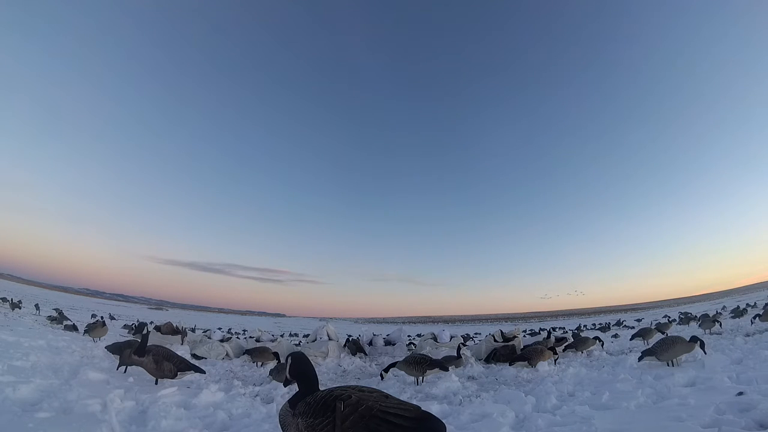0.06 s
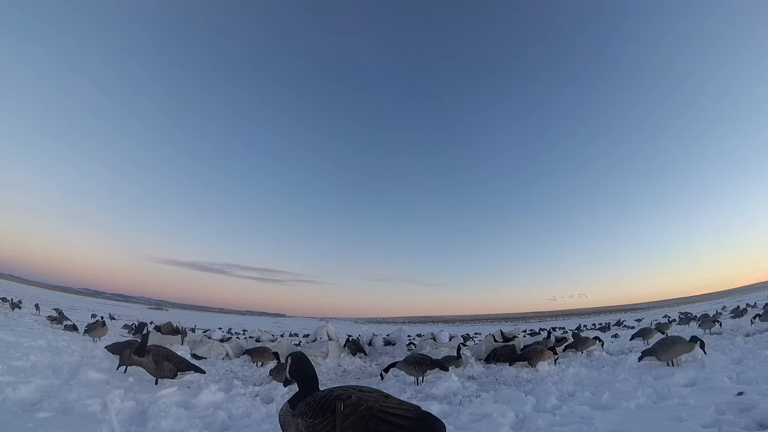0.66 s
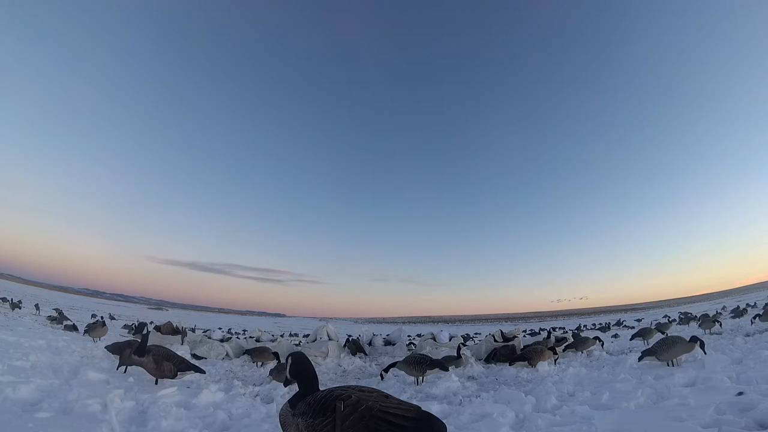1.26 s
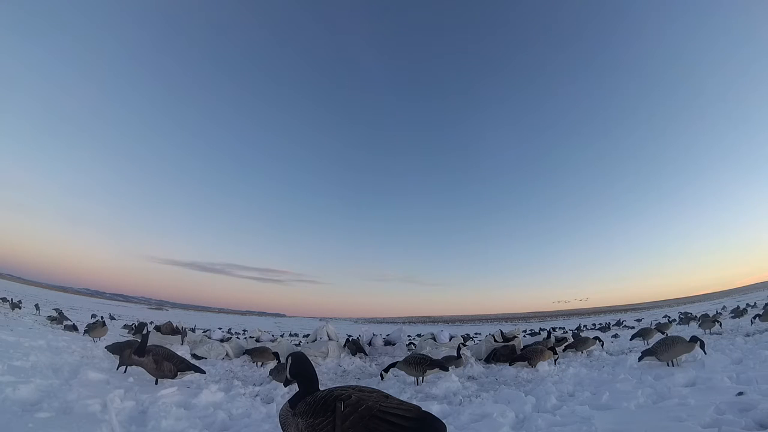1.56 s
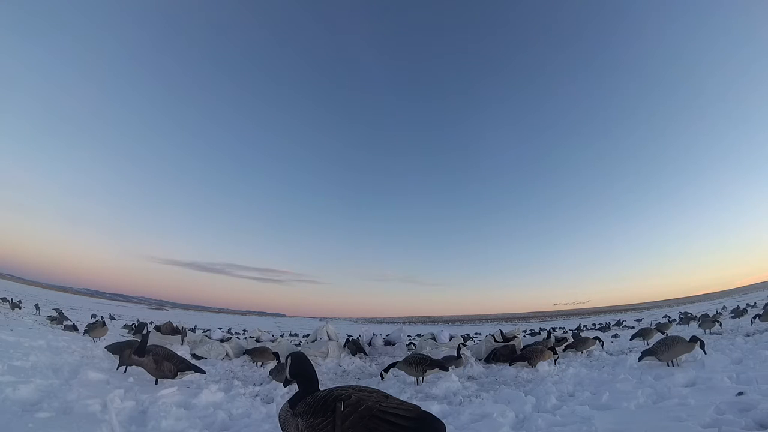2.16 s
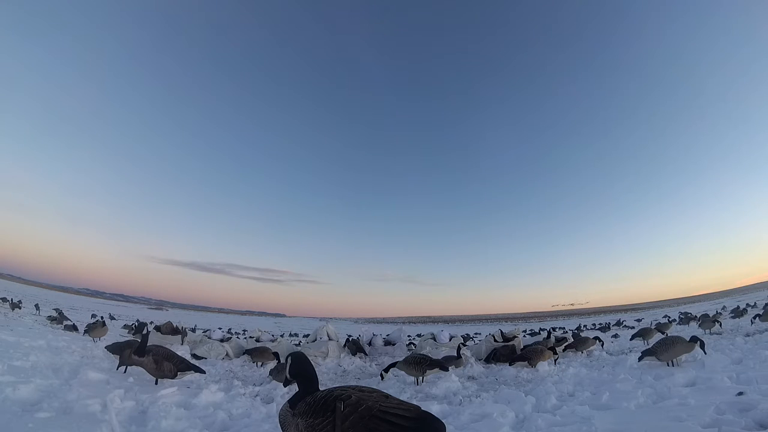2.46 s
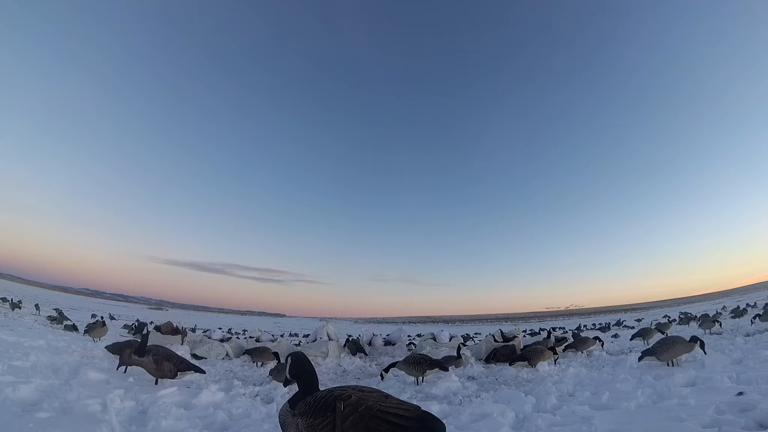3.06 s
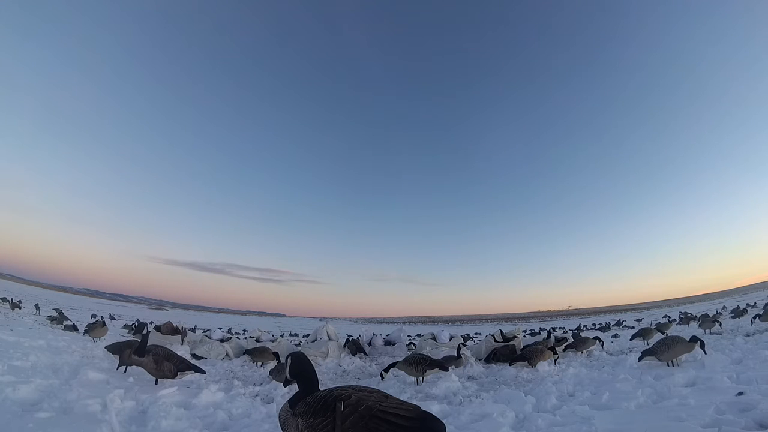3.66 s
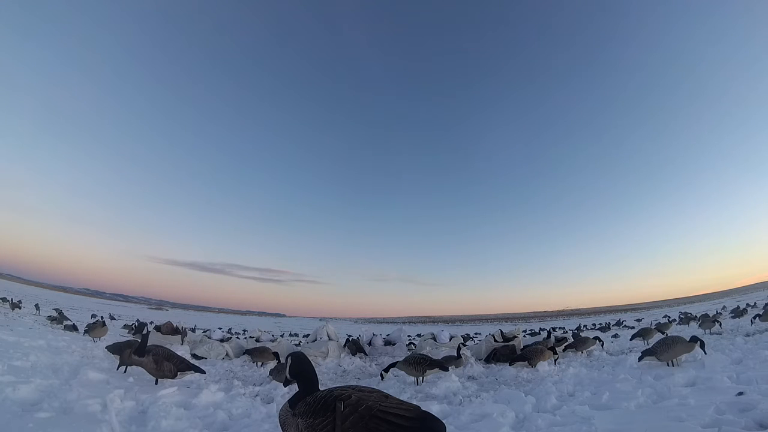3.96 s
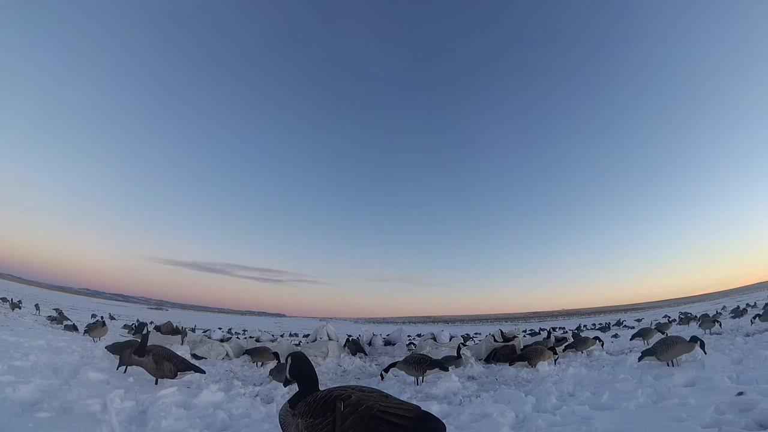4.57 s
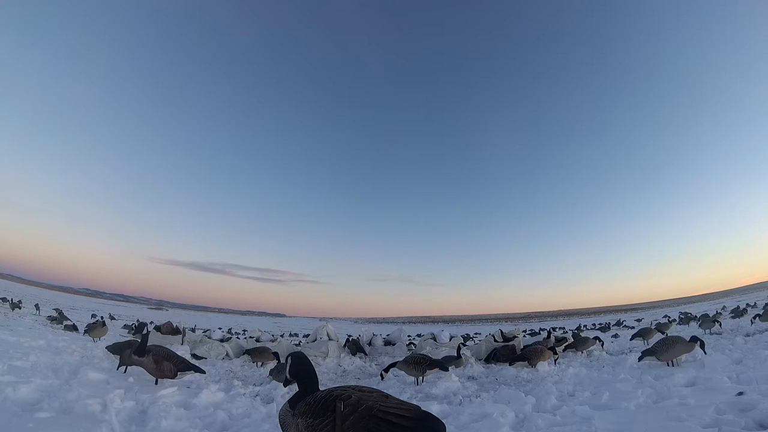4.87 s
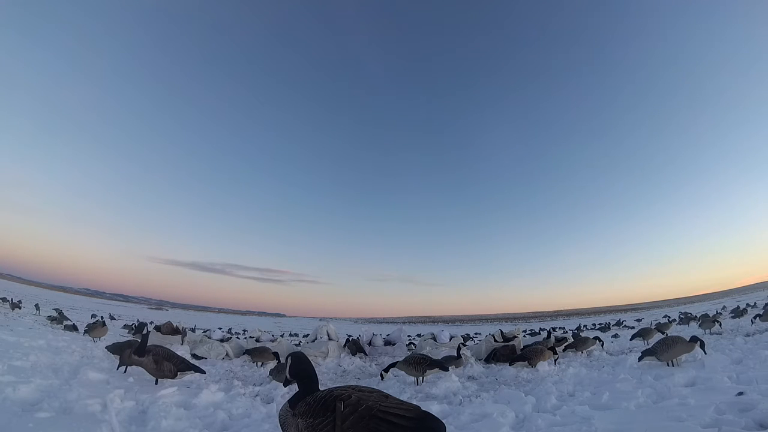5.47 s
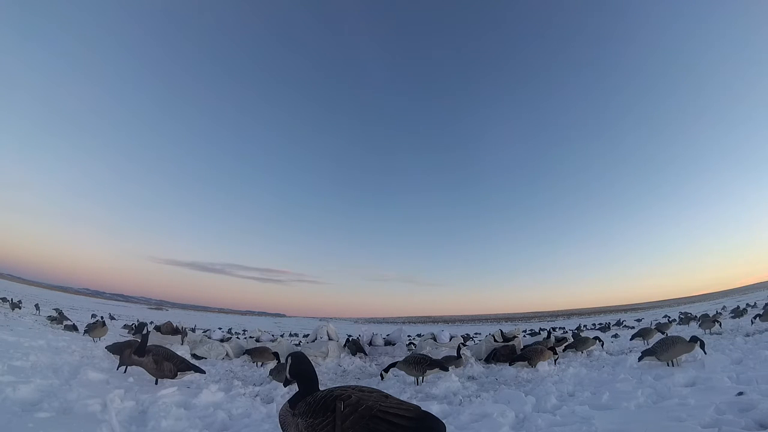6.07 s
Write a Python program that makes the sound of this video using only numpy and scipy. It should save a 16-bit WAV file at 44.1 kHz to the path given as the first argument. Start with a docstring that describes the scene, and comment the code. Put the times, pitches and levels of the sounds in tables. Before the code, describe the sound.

A goose calls in three bouts over an open snowy field. A full honk is a soft lead note and a low rattling murmur that breaks upward into a louder, sharp cluck, sagging at its end. Three honks come right away, peaking at about 0.2, 0.6 and 1.0 seconds. After a pause, a run of about six honks and clucks lasts from 2.3 to 4.3 seconds. Following another pause, three quicker ones come from 5.5 to 6.2 seconds, and one more soft note begins at about 6.3 seconds. The calls are nearly dry, with only a short, dull tail. Throughout, well below the goose, a distant flock blurs into a wavering drone. There is also a faint steady microphone hiss, a slight low rumble and hum, and a thin, very high, pulsing electronic whine.

```python
"""Goose calling over a snowy field

A goose honks in three bouts. A full honk is a soft lead note, a low murmur, then a break up into a loud
cluck that sags at its end. Source and filter: a vibrating membrane supplies harmonics in three registers,
and fixed throat resonances shape them all. The field scatters back a short, dull tail. Behind lie the
drone of a far flock, a low rumble and hum, steady hiss and a faint, pulsed electronic whine."""
import sys
import numpy as np
from scipy import signal
from scipy.fft import rfft, irfft
from scipy.io import wavfile
from scipy.ndimage import uniform_filter1d, map_coordinates

SR = 44100
rng = np.random.default_rng(int(sys.argv[2]) if len(sys.argv) > 2 else 0)


def generate_wav(signal):
    """Clip the signal to [-1, 1] and save it as 16-bit WAV at the path in sys.argv[1]."""
    frames = np.transpose(np.atleast_2d(signal))
    scaled = np.clip(frames, -1, 1) * 32767
    pcm = np.round(scaled).astype(np.int16)
    wavfile.write(sys.argv[1], SR, pcm)


N = 278271
TIME = np.arange(N) / SR
FREQS = np.fft.rfftfreq(N, 1 / SR)
SIDES = np.array([[.5], [-.5]])  # splits a left-minus-right difference between the channels
EDGE_S = .003  # a note opens and closes within twice this time


def undb(db):
    """Amplitude ratio of a level in decibels."""
    return 10 ** (np.asarray(db) / 20)

def unit(x):
    """Normalisation to rms 1."""
    return x / np.sqrt(np.mean(x ** 2))

def ramp(t, length_s):
    """Linear fall from 1 to 0 as t goes from 0 to length_s."""
    return np.clip(1 - t / length_s, 0, 1)

def curve(rows, t):
    """Linear interpolation of a table's value columns at times t."""
    times, *columns = np.transpose(rows)
    return [np.interp(t, np.sort(times), column) for column in columns]

def at_hz(points, hz):
    """Interpolation of (f/Hz, value) points on a logarithmic frequency axis."""
    f, value = np.transpose(points)
    return np.interp(np.log(np.maximum(hz, 1)), np.log(f), value)

def noise(spectrum):
    """Spectral shaping of white noise, normalised to rms 1."""
    return unit(irfft(rfft(rng.standard_normal(N)) * undb(at_hz(spectrum, FREQS)), N))

def wander(t, rate):
    """Smooth random fluctuation of spread near 1, with rate new values a second."""
    return map_coordinates(rng.standard_normal(8192), [(t - t[0]) * rate], order=3, mode="wrap")


# hiss spectrum: f/Hz, relative level/dB
HISS_SPECTRUM = [(60, -9), (300, -2), (1500, 0.5), (2200, 2), (4000, -0.5), (5100, 1.5), (5900, -2),
                 (8200, -2), (9200, 1.5), (12300, 1.5), (13400, 5), (15200, 2)]
# stereo width of the hiss: f/Hz, amplitude ratio of channel difference to channel mean
HISS_WIDTH = [(300, 1.87), (6000, 2.17), (9000, 2.8), (13000, 1.9)]

def hiss():
    """Microphone self-noise: steady, broadband and largely uncorrelated between the channels."""
    difference = irfft(rfft(noise(HISS_SPECTRUM)) * at_hz(HISS_WIDTH, FREQS), N)
    return undb(-63.5) * (noise(HISS_SPECTRUM) + SIDES * difference)


# the two whine tones: f/Hz
WHINE_HZ = (11204, 10787)
# their strengths before gating: level/dB, left minus right/dB
WHINE_LEVELS = [(-63.5, -7), (-74, -7)]
# switching cycle: fraction of the period, gain
WHINE_GATE = [(0, .85), (.12, .8), (.19, 1.2), (.23, 1.1), (.28, .05), (.8, .05), (.89, .8), (1, .85)]

def whine(switch_hz=59.94):
    """Amplitude modulation: electronics gate two thin tones and a fizz, ticking at each switch."""
    cycle = TIME * switch_hz % 1
    gate, = curve(WHINE_GATE, cycle)
    waver = .75 * wander(TIME, 70)
    tones = sum(undb(db + SIDES * pan_db) * np.sqrt(2) * np.sin(2 * np.pi * hz * TIME + waver)
                for hz, (db, pan_db) in zip(WHINE_HZ, WHINE_LEVELS))
    fizz = noise([(9500, -30), (10600, -8), (11200, 0), (11600, -15), (12500, -25)])
    switching = np.exp(-((cycle - .21) / .099) ** 2) + np.exp(-((cycle - .87) / .066) ** 2)
    ticks = switching * noise([(6000, -25), (9300, 0), (12000, -6), (13400, 3), (15000, -3)])
    return gate * (tones + undb(-68 - SIDES * 6) * fizz) + undb(-69 + SIDES * 4) * ticks


# rumble spectrum: f/Hz, relative level/dB
RUMBLE_SPECTRUM = [(20, 3), (31, -13), (50, -9), (68, -2.5), (90, -2.5), (130, 0.5), (175, -14), (215, -1),
                   (240, -8), (262, 2.5), (300, -7.5), (326, 2.5), (365, -6), (420, -1.5), (480, -15),
                   (1200, -24)]
# rumble envelope: t/s, level/dB
RUMBLE_LEVEL = [(0, -71), (1, -72), (1.8, -77.5), (2.3, -79.5), (2.8, -69), (3.6, -71), (4.5, -72),
                (4.9, -76), (5.55, -68), (6.3, -72)]

def rumble():
    """Low-frequency noise under a slow envelope, nearly coherent between the channels."""
    db, = curve(RUMBLE_LEVEL, TIME)
    return undb(db) * (noise(RUMBLE_SPECTRUM) + .074 * SIDES * noise(RUMBLE_SPECTRUM))


# hum envelopes: t/s, level at 121 Hz/dB, level at 87 Hz/dB
HUM_LEVELS = [(0, -97, -78), (.55, -76, -98), (1.05, -81, -79), (1.5, -108, -96), (2, -79.5, -84),
              (2.5, -93, -98), (2.8, -76, -92), (3.55, -74, -84), (4.05, -81, -88), (4.5, -71, -77),
              (5.05, -85, -90), (5.5, -78.5, -87), (5.8, -76.5, -72), (6.05, -79, -86), (6.3, -75, -84)]

def hum():
    """Random phase modulation makes two far, low tones waver."""
    return sum(undb(db) * np.sqrt(2) * np.sin(2 * np.pi * hz * TIME + .36 * wander(TIME, 4.8))
               for hz, db in zip((121, 87), curve(HUM_LEVELS, TIME)))


# flock spectrum: f/Hz, relative level/dB
FLOCK_SPECTRUM = [(450, -21), (540, -14.5), (610, -5.5), (680, -14), (760, 0.5), (810, -5.5), (870, -3),
                  (930, 2.5), (985, -4.5), (1080, -12), (1200, -24), (1350, -11.5), (1520, -16.5),
                  (2200, -39.5)]
# flock envelope: t/s, level/dB
FLOCK_LEVEL = [(0, -66.5), (.8, -65), (1.3, -65), (2.1, -65.5), (2.7, -65.5), (3.4, -63.5), (4.4, -63.5),
               (4.8, -65), (5.3, -64.5), (6.3, -63)]

def flock():
    """Incoherent superposition: far calls blur to a wavering drone, modelled as shaped noise."""
    db, = curve(FLOCK_LEVEL, TIME)
    envelope = undb(db + wander(TIME, 6.9) + SIDES * 1.8)
    return envelope * (noise(FLOCK_SPECTRUM) + .13 * SIDES * noise(FLOCK_SPECTRUM))


# envelope of the thin tone above the drone: t/s, level/dB
RING_LEVEL = [(0, -74), (.8, -67.5), (1.35, -69.5), (1.8, -72), (2.25, -71), (3.3, -69.5), (4.4, -71),
              (4.9, -68.5), (5.3, -71), (6.25, -67.5)]

def ring(hz=988):
    """Narrow-band noise: two random quadrature components form a thin, unsteady tone."""
    db, = curve(RING_LEVEL, TIME)
    phase = 2 * np.pi * hz * TIME
    tone = wander(TIME, 38) * np.cos(phase) + wander(TIME, 38) * np.sin(phase)
    return undb(db + SIDES * 2.6) * tone


def field(calls, scatter_db=-25.5, t60_s=.15, echo_s=.058, echo_db=-35.5):
    """Scattering and reflection: snow and things standing on it return a dull tail and one faint echo."""
    mono = calls.mean(axis=0)
    t = TIME[:SR // 2]
    dull = signal.butter(1, 2500, fs=SR, output="sos")
    middle, side = rng.standard_normal((2, len(t))) * np.exp(-np.log(1000) * t / t60_s) * (t > .004)
    tail = signal.sosfilt(dull, middle + SIDES * side)
    tail /= np.sqrt(np.mean(np.sum(tail ** 2, axis=1)))
    scatter = signal.fftconvolve(mono[None], tail, axes=1)[:, :N]
    echo = signal.sosfilt(dull, np.interp(TIME - echo_s, TIME, mono, left=0))
    return undb(scatter_db) * scatter + undb(echo_db) * echo


# throat resonances: f/Hz, bandwidth/Hz, level/dB
FORMANTS = [(615, 62, -28), (776, 143, -9), (888.6, 63, 2.5), (997, 80, 9), (1242, 39, -4),
            (1617, 360, 0.5), (2203, 104, -9.5), (2444, 65, -10), (2720, 380, -11), (3307, 160, -16),
            (3610, 320, -16), (4072, 100, -14), (4350, 247, -12.5), (4660, 250, -22), (5880, 1280, -25),
            (6484, 290, -22.5), (7460, 230, -27), (9100, 760, -34.5)]
# narrow dips, and two slight lifts: f/Hz, width/Hz, gain/dB
NOTCHES = [(1167, 103, -12.5), (1930, 88, 5), (2584, 81, -18), (3250, 58, -22), (4340, 110, 1.5),
           (5200, 330, -9)]

def throat(hz):
    """Resonance of windpipe and bill: a gain with steep peaks and deep valleys."""
    peaks = sum(undb(db) / (1 + (2 * (hz - f) / width) ** 2) for f, width, db in FORMANTS)
    notch_db = sum(db * np.exp(-(2 * (hz - f) / width) ** 2) for f, width, db in NOTCHES)
    return peaks * undb(notch_db)


# effect of the bill's opening: t/s, tilt above 2 kHz/(dB/octave), reedy edge at 5.8 kHz/dB
BILL_OPENING = [(0, -1, 6), (.24, -4, 17), (.63, -2, 11.5), (1.07, -2, 13), (2.38, 2.5, -10),
                (2.55, -0.5, -5), (2.87, 0, -6), (3.2, 1, -4), (3.6, 0, -5), (3.9, 1.5, -1), (4.24, 0.5, 0),
                (5.64, -0.5, -2), (5.91, 0.5, 1), (6.18, 2, -4)]

def bill_db(t, hz, strain):
    """Radiation from the bill: its opening sets the treble, and strain tilts that down."""
    tilt, edge_db = curve(BILL_OPENING, t)
    treble_db = (tilt - 5 * strain) * np.log2(np.maximum(hz / 2000, 1))
    return treble_db + edge_db * np.exp(-((hz - 5800) / 380) ** 2)


# level difference of the caller between the channels: f/Hz, left minus right/dB
STEREO_LEVEL = [(800, 1.5), (1600, 3), (2250, -0.5), (2450, -0.5), (3100, -8), (3600, -2), (3950, 7),
                (4400, 1), (5200, 5), (5800, 11), (6700, -10.5), (7600, 5.5)]
# its phase difference: f/Hz, lead of the left/rad
STEREO_PHASE = [(800, 0.17), (1450, -1.13), (1700, 0.53), (2400, 0.33), (3000, 2.5), (4300, 1.08),
                (5000, 2), (6200, 2.5), (7600, 2.04)]

def stereo_partials(hz, phase):
    """Two-point reception: each partial reaches left and right with its own level and lag."""
    sides = SIDES[:, :, None]
    return undb(sides * at_hz(STEREO_LEVEL, hz)) * np.cos(phase + sides * at_hz(STEREO_PHASE, hz))


def during(start, length):
    """Time window of a note: its samples, the seconds since its start and those until its end."""
    span = np.flatnonzero((TIME > start - EDGE_S) & (TIME < start + length + EDGE_S))
    return span, TIME[span] - start, start + length - TIME[span]


def membrane(window, hz, db, colour, jitter, shimmer, crack, rasp_db, slack_tilt, taut_hz, strain=0):
    """Source-filter model of one note: returns the throat-filtered harmonics and the raw air noise."""
    span, age, left = window
    t = TIME[span]
    dulling = slack_tilt * np.minimum(np.log2(hz / taut_hz), 0)  # dB/octave lost by a slack membrane
    # the oscillation is least regular as it starts and stops
    unsteady = 1 + crack * (np.exp(-(age / .012) ** 2) + .59 * np.exp(-(left / .0093) ** 2))
    hz = hz * (1 + jitter * unsteady * wander(t, 586))
    phase = 2 * np.pi * np.cumsum(hz) / SR
    # strain adds a rattle at a third of the pitch and weakens the odd overtones
    rattle = strain * np.sin(phase / 3 + .42 * wander(t, 63))
    phase += .13 * rattle
    k = np.arange(1, 15)[:, None]
    partial_hz = k * uniform_filter1d(hz, size=130)
    source_db = at_hz(colour, partial_hz) - 8 * strain * (k % 2) * (k > 1)
    source_db += dulling * np.log2(np.maximum(partial_hz / 1300, 1))
    gains = throat(partial_hz) * undb(source_db + bill_db(t, partial_hz, strain))
    gains /= np.sqrt(np.sum(gains ** 2, axis=0) / 2)
    # the upper partials swell and fade independently
    gains *= undb(.9 * np.clip(partial_hz / 2000 - 1, 0, 1) * np.array([wander(t, 45) for _ in k]))
    throat_lag = 2.6 * np.log(partial_hz / 1000)
    partials = stereo_partials(partial_hz, k * phase - throat_lag)
    fade = 1 - ramp(np.minimum(age, left) + EDGE_S, 2 * EDGE_S)
    envelope = undb(db) * fade * (1 + shimmer * unsteady * wander(t, 605) + .21 * rattle)
    puffs = (1 + np.cos(phase)) * rng.standard_normal(len(t))  # air escapes once a cycle
    voice, air = np.zeros((2, N)), np.zeros(N)
    voice[:, span] = envelope * np.sum(gains * partials, axis=1)
    air[span] = undb(rasp_db) * envelope * unsteady * puffs
    return voice, air


# murmurs: t/s, length/s, crest delay/s, first f/Hz, crest f/Hz, last f/Hz,
# arch exponent (1 pointed, 2 round), base level/dB, strain (0-1)
MURMURS = [(0.123, 0.094, 0.043, 505.5, 595, 509, 1.24, -56.5, 0.42),
           (0.506, .098, 0.065, 495, 611, 545, 2, -57.5, 0.35),
           (0.938, 0.096, 0.056, 534, 605, 546, 2, -56, 0.44),
           (2.278, 0.056, 0.061, 472, 587, 580, 0.66, -54.5, 0.39),
           (2.432, 0.086, 0.016, 567, 573, 524, 1.94, -52.5, 0.72),
           (2.664, .185, .096, 491.3, 611.7, 537, 1.59, -56, 0.45),
           (3.110, 0.054, .044, 522, 620, 560, 1.2, -57.5, .35),
           (3.360, .228, 0.18, 450, 567, 534, 0.52, -55.5, 0.089),
           (3.817, 0.052, 0.07, 501, 605, 585, 1.6, -57, 0.74),
           (4.135, 0.065, 0.0435, 533, 614, 598, 1.5, -57, .6),
           (5.438, 0.014, .018, 479, 505, 509, .8, -54, 0.71),
           (5.544, 0.069, 0.034, 530, 596, 555, 1.9, -55, 0.81),
           (5.805, 0.087, .062, 497, 620.6, 601, 1.95, -56, 0.61),
           (6.070, 0.085, 0.065, 521, 628.5, 615, 2.14, -56.5, 0.78)]
# membrane spectrum in the low register: f/Hz, relative level/dB
MURMUR_COLOUR = [(550, -0.5), (1100, 4.5), (1700, -2.5), (2400, 5), (3000, 14), (3600, 8), (4400, -2),
                 (6500, -13)]
# swell where the partials meet resonances: fundamental f/Hz, gain/dB
MURMUR_BLOOM = [(455, -1), (480, -1.5), (497, 2.5), (515, 5.5), (535, 1.5), (560, -1.5), (587, -3),
                (600, 0.5), (611, 6), (627, 8)]

def murmur(start, length, crest, first_hz, crest_hz, last_hz, roundness, level_db, strain):
    """Resonant reinforcement: a low, rattling note blooms as its arching pitch crosses the resonances."""
    window = _, age, left = during(start, length)
    climb = ramp(age, crest) ** roundness
    sink = ramp(left, max(length - crest, EDGE_S)) ** roundness
    hz = crest_hz + (first_hz - crest_hz) * climb + (last_hz - crest_hz) * sink
    db = level_db + at_hz(MURMUR_BLOOM, hz) - 6 * ramp(age, .014)
    waver = 1 + .0082 * wander(age, 60.7)
    return membrane(window, hz * waver, db, MURMUR_COLOUR, jitter=.009, shimmer=.11, crack=.94,
                    rasp_db=-11.5, slack_tilt=11, taut_hz=596, strain=strain)


# lead notes: t/s, length/s, f/Hz and level/dB at full effort, ebb/(dB/s)
LEADS = [(0.003, 0.11, 766.5, -45, 38), (0.413, 0.09, 758, -46, 49), (0.854, 0.081, 751.5, -47.5, 38),
         (2.329, 0.11, 801.6, -42, 38.5), (2.994, 0.11, 802, -40, 66.5), (3.729, 0.079, 805.5, -40, 119),
         (4.046, 0.1, 779, -43.5, 104), (5.455, 0.1, 760, -47, 116), (5.765, 0.036, 761, -46, 172),
         (6.027, 0.048, 807, -41.3, 144), (6.294, .060, 798, -42.5, 60)]
# membrane spectrum in a lead note: f/Hz, relative level/dB
LEAD_COLOUR = [(750, 5.5), (1500, 1.5), (2300, 1), (3100, 3), (3800, 1.5), (4600, -5), (6000, 3),
               (8000, -3)]

def lead(start, length, pitch_hz, level_db, ebb, hz_per_db=5.5):
    """Coupling of pitch and level: both follow the effort as a soft note rises, ebbs and lets go."""
    window = _, age, left = during(start, length)
    effort_db = -9 * ramp(age, .0081) - ebb * age - 7.5 * ramp(left, .017)
    return membrane(window, pitch_hz + hz_per_db * effort_db, level_db + effort_db, LEAD_COLOUR,
                    jitter=.0023, shimmer=.011, crack=9.9, rasp_db=-35, slack_tilt=13, taut_hz=780)


# clucks: t/s, length/s, crest delay/s, crest f/Hz, bend/(Hz/s^2), level/dB, squeak level/dB
CLUCKS = [(0.210, .067, .024, 806.5, 26000, -40.3, -54), (0.598, .067, 0.0072, 835, 23000, -39, -45.5),
          (1.037, 0.078, 0.0088, 844.4, 24000, -39.3, -49), (2.511, 0.068, .028, 824, 54700, -39.5, -49.5),
          (2.844, 0.063, 0.017, 828.6, 49700, -39.5, -49), (3.161, 0.084, .026, 874.7, 39200, -37.5, -46.5),
          (3.583, 0.063, .023, 822, 75000, -40, -50), (3.867, 0.086, 0.033, 860, 44700, -39, -44.5),
          (4.200, 0.084, .008, 855, 21700, -38.5, -46.5), (5.614, 0.063, 0.0213, 843.5, 48700, -38.5, -47),
          (5.891, 0.051, 0.0212, 866.6, 155000, -38.5, -47), (6.156, 0.06, .023, 877, 80500, -36.5, -47)]
# membrane spectrum in a cluck: f/Hz, relative level/dB
CLUCK_COLOUR = [(800, -1.06), (1650, -0.36), (2450, 0), (3300, -0.5), (4200, -0.7), (5000, 0), (6000, 0.3),
                (8000, 1.4)]

def cluck(start, length, crest, crest_hz, bend, level_db, slack_hz=653, db_per_hz=.05):
    """Tension sets pitch: a loud, sharp note arches, then collapses as the membrane goes slack."""
    window = _, age, left = during(start, length)
    arch_hz = crest_hz - bend * (age - crest) ** 2
    release = ramp(left, .0136)
    hz = arch_hz * (1 - release) + slack_hz * release
    db = level_db - db_per_hz * (crest_hz - hz) - 10.5 * ramp(age, .0086) - 11 * release
    return membrane(window, hz, db, CLUCK_COLOUR, jitter=.0019, shimmer=.013, crack=16.4,
                    rasp_db=-35.5, slack_tilt=16, taut_hz=846)


# squeak that opens one lead note: t/s, note f/Hz, level/dB
LEAD_SQUEAK = (2.323, 810, -48)

def squeaks(pitch_ratio=1.6, delay_s=.005, half_length_s=.007):
    """Register break: a brief tone and its octave as the membrane jumps into each cluck and one lead."""
    out = np.zeros(N)
    cluck_squeaks = [(start, hz, db) for start, _, _, hz, _, _, db in CLUCKS]
    for start, hz, db in cluck_squeaks + [LEAD_SQUEAK]:
        centre = start + delay_s
        span = np.flatnonzero(abs(TIME - centre) < 3 * half_length_s)
        t = TIME[span]
        phase = 2 * np.pi * np.cumsum(pitch_ratio * hz * (1 + .0074 * wander(t, 405))) / SR
        envelope = undb(db) * np.exp(-((t - centre) / half_length_s) ** 2)
        out[span] += envelope * np.sqrt(2) * (np.sin(phase) + undb(-18.5) * np.sin(2 * phase))
    return out * undb(SIDES * 4.5)


def goose():
    """Voiced and noise sources share one filter: the throat colours the rasp of all three registers."""
    notes = [lead(*row) for row in LEADS]
    notes += [murmur(*row) for row in MURMURS]
    notes += [cluck(*row[:-1]) for row in CLUCKS]
    voices, airs = zip(*notes)
    rasp = irfft(rfft(sum(airs)) * unit(throat(FREQS) ** .91), N)
    return sum(voices) + squeaks() + rasp * undb(SIDES * 1.5)


def scene():
    """Superposition of the direct calls, their return from the field and the background."""
    calls = goose()
    return calls + field(calls) + flock() + rumble() + hum() + ring() + hiss() + whine()


def record(dry):
    """Band limiting: a steep low-pass filter cuts off above 15.1 kHz."""
    return signal.sosfilt(signal.ellip(10, .2, 70, 15100, fs=SR, output="sos"), dry)


dry = scene()
out = record(dry)
generate_wav(out)
```